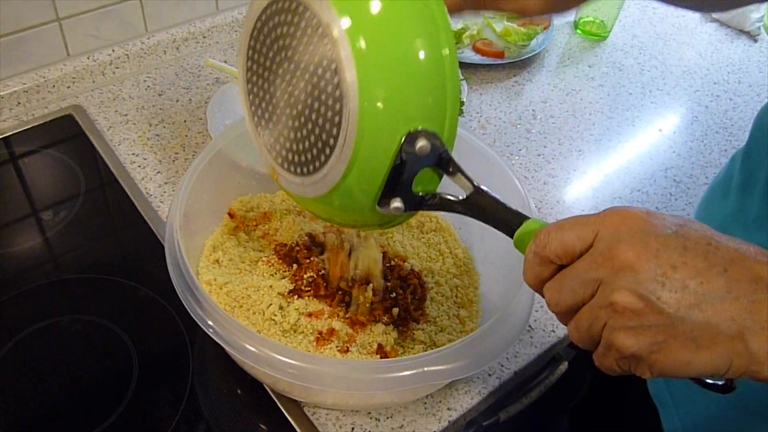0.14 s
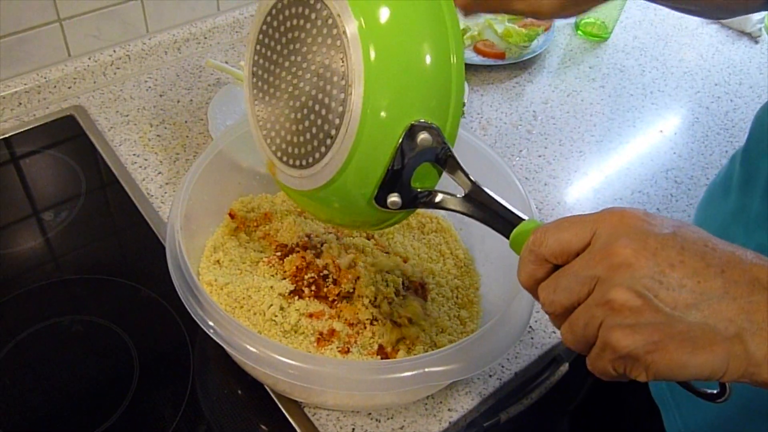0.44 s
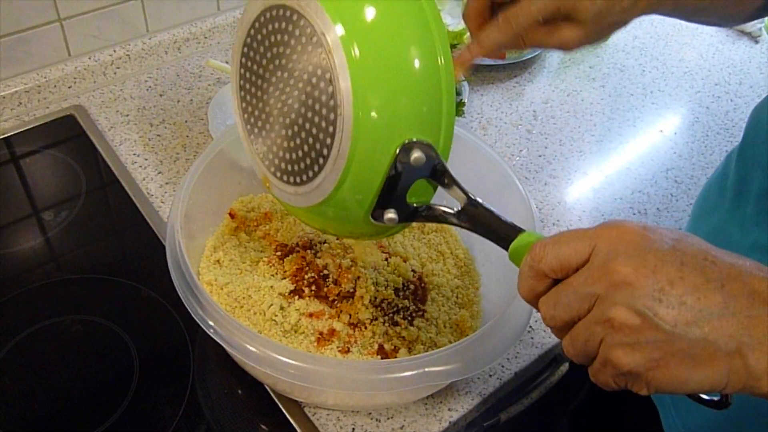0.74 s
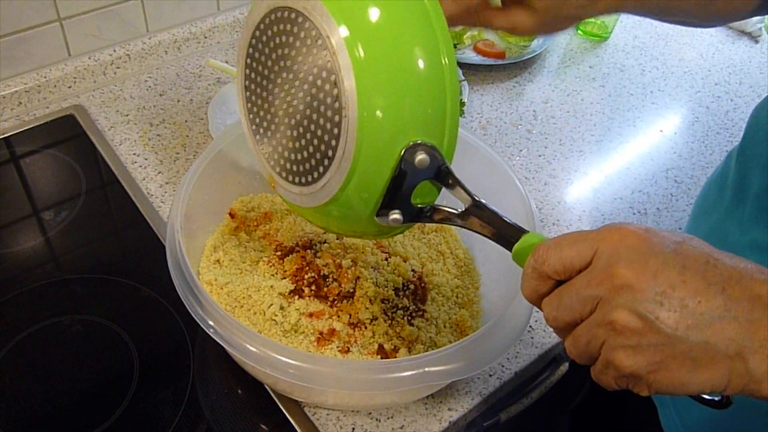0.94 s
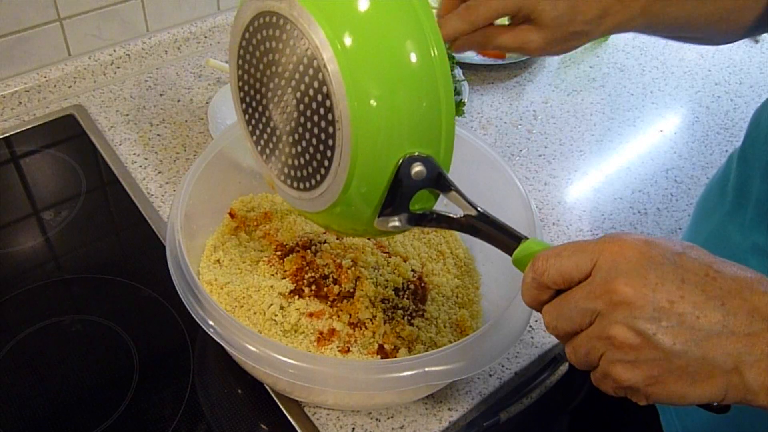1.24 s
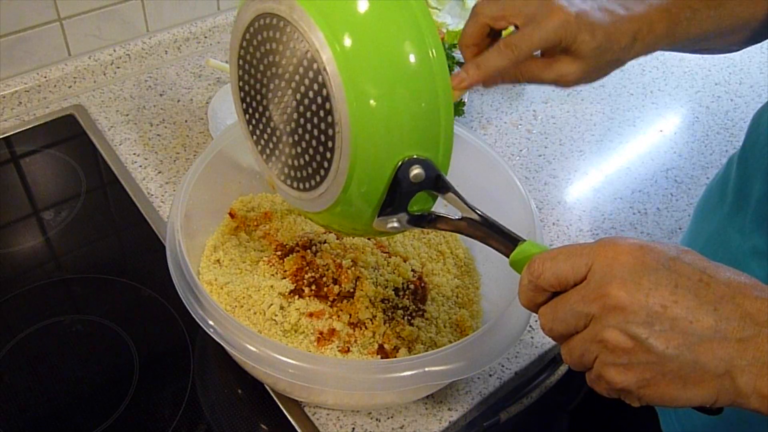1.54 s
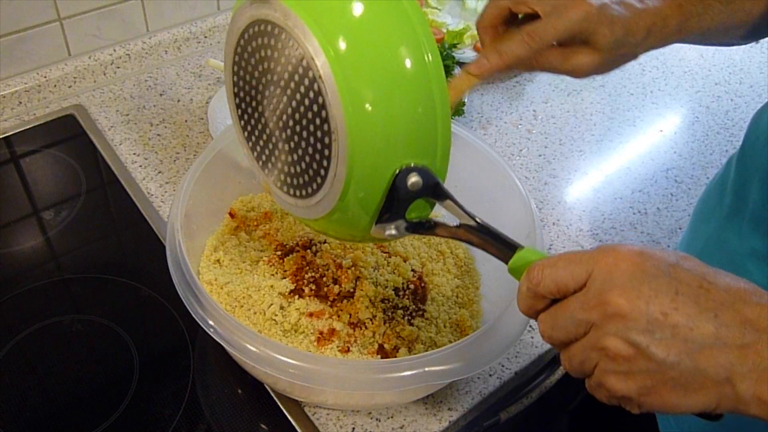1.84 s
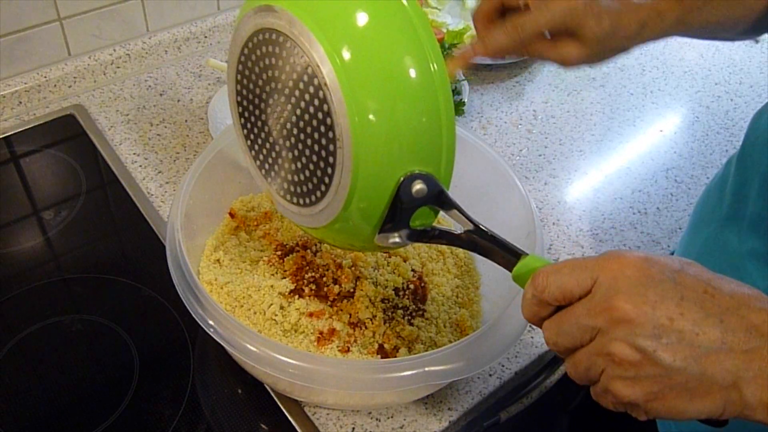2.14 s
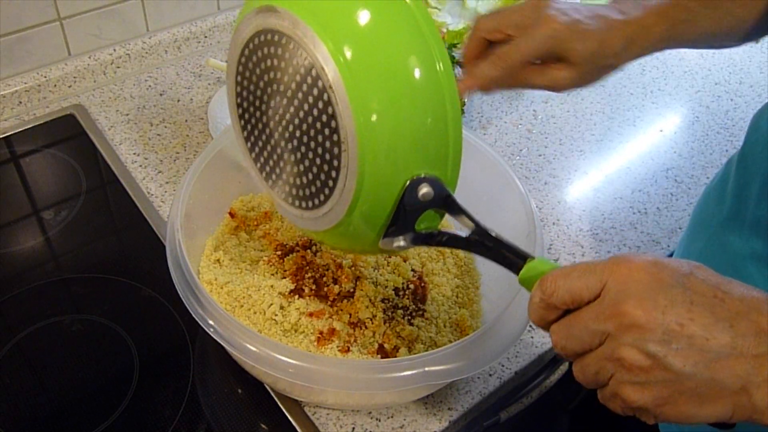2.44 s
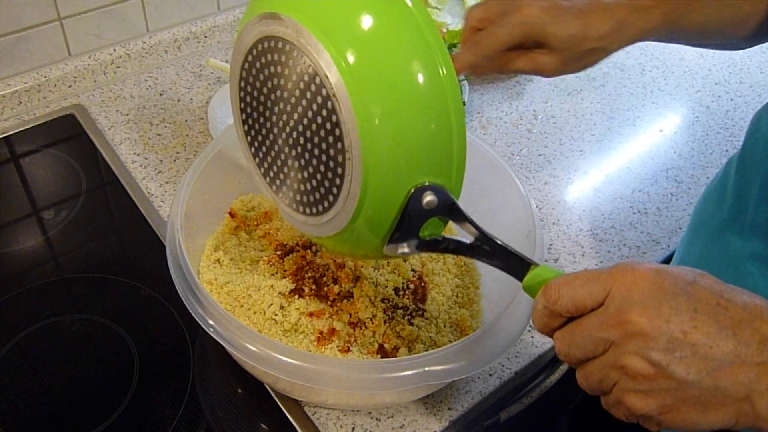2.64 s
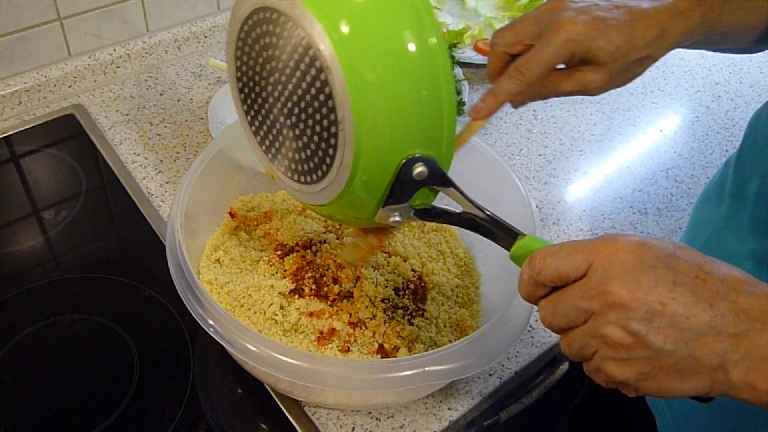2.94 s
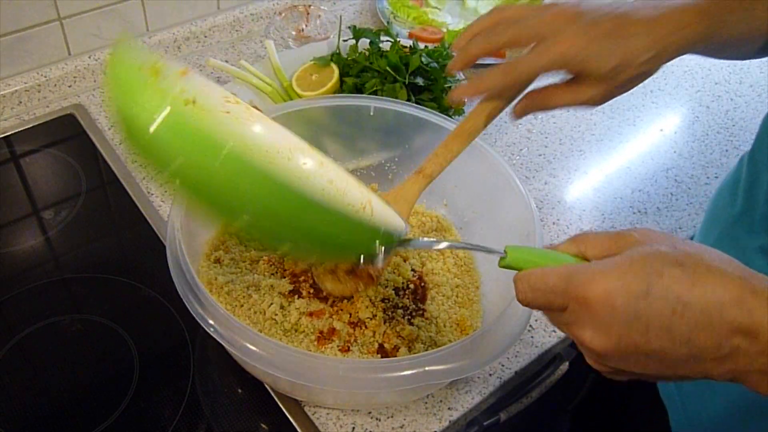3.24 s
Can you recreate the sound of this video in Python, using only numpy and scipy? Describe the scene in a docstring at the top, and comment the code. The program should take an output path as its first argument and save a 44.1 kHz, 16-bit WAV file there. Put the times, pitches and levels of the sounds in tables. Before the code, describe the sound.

A wooden spoon knocks and scrapes a nonstick pan after food plops into a plastic bowl

```python
"""Over a steady hiss with a faint whine (coloured noise, a sine), lumps of food plop into a plastic bowl
(noise bursts, low partials). A wooden spoon then knocks on a nonstick pan (dispersed clack, ringing
partials) and scrapes it out (random slips through the pan's response). At the end the pan bumps the
bowl (pulse, rattle, partials). A small kitchen answers briefly (decaying noise as impulse response)."""
import sys
import numpy as np
from scipy import signal
from scipy.fft import rfft, irfft
from scipy.io import wavfile

SR = 44100
rng = np.random.default_rng(int(sys.argv[2]) if len(sys.argv) > 2 else 0)


def wrap_up_sound(samples):
    """Save the sound to the file named by the first command line argument, as 16-bit audio."""
    columns = np.atleast_2d(samples).T
    # keep every value between -1 and 1, then stretch to whole-number steps
    tamed = np.clip(columns, -1, 1)
    steps = np.round(tamed * 32767).astype(np.int16)
    wavfile.write(sys.argv[1], SR, steps)


N = 149940

# partials of the pan wall: (frequency [Hz], level [dB], t60 [s])
PAN_WALL_MODES = [(276, -9, 0.038), (412, -5, 0.046), (482, -6, 0.16), (546, -12.5, 0.27), (800, -10, 0.16),
                  (915, -7, 0.12), (1035, -11.5, 0.04), (1065, -10.5, 0.19), (1210, -27.5, 0.032),
                  (1344, -10.5, 0.077), (1658, -2, 0.1), (1840, -7, 0.092), (3140, -13, .12),
                  (4160, -11, 0.094)]
# thin high partials of the pan rim: (frequency [Hz], level [dB], t60 [s])
PAN_RIM_MODES = [(2787, -6.5, 0.088), (3084, -2, 0.051), (5240, -4, 0.12), (5370, 9, 0.017),
                 (6460, -3.5, 0.035), (6750, -16, 0.041), (9480, -19, .04)]


def undb(db):
    """Decibels to gain."""
    return 10 ** (np.asarray(db) / 20)


def unit(x):
    """Scale to unit energy."""
    return x / np.sqrt(np.sum(x ** 2))


def add(out, start_s, x):
    """Mix a sound in at a time."""
    i = max(int(start_s * SR), 0)
    out[i:i + len(x)] += x[:max(N - i, 0)]


def fade(t60_s):
    """One second of exponential decay, -60 dB at t60."""
    return np.exp(-np.log(1000) * np.arange(SR) / SR / t60_s)


def lowpass(x, hz, order=2):
    """Gentle treble roll-off."""
    return signal.sosfilt(signal.butter(order, hz, fs=SR, output="sos"), x)


def through(x, response):
    """Pass a sound through an impulse response."""
    return signal.fftconvolve(x, response)[:len(x)]


def click(colour, size=4096):
    """Causal, minimum-phase, unit-energy pulse with the given (Hz, dB) colour."""
    hz, db = np.array(colour).T
    f = np.maximum(np.arange(size // 2 + 1) * SR / size, 1)
    gain = undb(np.interp(np.log(f), np.log(hz), db))
    # folding the cepstrum onto positive times gives minimum phase
    cepstrum = irfft(np.log(gain))
    cepstrum[1:size // 2] *= 2
    cepstrum[size // 2 + 1:] = 0
    pulse = irfft(np.exp(rfft(cepstrum)))
    return unit(np.pad(pulse, (0, SR - size)))


def burst(pulse, t60_s):
    """Dense, quickly dying vibration with the colour of a pulse."""
    return unit(through(rng.standard_normal(SR) * fade(t60_s), pulse))


def ring(modes):
    """Decaying partials, neighbours swinging in opposite directions."""
    t = np.arange(SR) / SR
    out = np.zeros(SR)
    for k, (hz, db, t60_s) in enumerate(modes):
        out += (-1) ** k * undb(db) * fade(t60_s) * np.sin(2 * np.pi * hz * t)
    return out


def background():
    """Room noise and hiss as coloured noise, with a faint electrical whine as a sine."""
    # noise spectrum: (frequency [Hz], relative density [dB per Hz])
    hiss_colour = [(18, -11), (30, -33), (33, -12), (225, -2), (302, -6), (377, -4), (470, -7), (1140, -13),
                   (1220, -15.5), (1350, -14.5), (1600, -15.5), (2000, -17.5), (6510, -23), (8740, -33),
                   (10600, -52.5), (13800, -78), (22000, -120)]
    hiss_db, whine_hz, whine_rms_db = -55, 7530, -86
    hiss = through(rng.standard_normal(N), click(hiss_colour))
    whine = np.sqrt(2) * np.sin(2 * np.pi * whine_hz * np.arange(N) / SR)
    return undb(hiss_db) * hiss + undb(whine_rms_db) * whine


def food_plops():
    """Moist lumps land with a tick and a dull thump of the filled bowl."""
    # landings: (time [s], level [dB], brightness [Hz], low thump [dB], wet tick [dB])
    plops = [(.043, -14.5, 2000, -15, -2), (.051, -8.5, 900, -12, -18), (0.076, -13, 696, 8, -20),
             (0.121, 0, 550, 0.5, -25), (0.154, 0, 1390, 2.5, -14), (0.165, -20, 600, -4, -30),
             (0.184, -13.5, 1700, -10, -9), (0.2525, -2, 2440, 6.5, 3.5), (0.384, -15, 1200, -21, -17)]
    # colour of the soft impact: (frequency [Hz], level [dB])
    food_colour = [(80, -6.5), (200, 0), (550, 2.5), (1000, -5), (1250, -13), (1650, -3), (2400, -17),
                   (8000, -36)]
    # colour of the wet tick: (frequency [Hz], level [dB])
    tick_colour = [(1500, -22), (2900, -5.5), (3400, 0), (4000, -1), (4700, -15), (7000, -18.5),
                   (10500, -45)]
    # partials of the filled bowl: (frequency [Hz], level [dB], t60 [s])
    thump_modes = [(143.7, -2, 0.12), (241, 2.5, 0.1), (276, 0.5, 0.055)]
    food_gain_db, tick_gain_db, thump_gain_db = -12, -23.5, -41
    food_t60_s, tick_t60_s = .04, 0.0055

    out = np.zeros(N)
    food, tick, thump = click(food_colour), click(tick_colour), ring(thump_modes)
    for time_s, db, bright_hz, thump_db, tick_db in plops:
        x = undb(food_gain_db) * lowpass(burst(food, food_t60_s), bright_hz)
        x = x + undb(thump_gain_db + thump_db) * thump
        x = x + undb(tick_gain_db + tick_db) * burst(tick, tick_t60_s)
        add(out, time_s, undb(db) * x)
    return out


def kitchen(x):
    """Diffuse reflections: coloured noise tail whose treble dies slightly sooner."""
    # colour of the reverberation: (frequency [Hz], level [dB])
    room_colour = [(100, -3.5), (300, -1), (550, -1.5), (900, 1), (1300, -5.5), (1700, -1), (3500, -8),
                   (9000, -4)]
    t60_s, treble_t60_s, split_hz, delay_s = 0.52, 0.45, 3300, .012
    noise = rng.standard_normal(SR)
    low = lowpass(noise, split_hz, order=1)
    tail = unit(low * fade(t60_s) + (noise - low) * fade(treble_t60_s))
    hz, db = np.array(room_colour).T
    bin_hz = np.arange(SR // 2 + 1) + 1  # 1 Hz bins, offset by one to avoid log(0)
    gain = undb(np.interp(np.log(bin_hz), np.log(hz), db))
    tail = irfft(rfft(tail) * gain)[:SR * 3 // 4]
    return through(x, np.pad(tail, (int(delay_s * SR), 0)))


def disperse(x, count=6):
    """Bending waves carry treble faster than bass: all-passes smear a click into a downward chirp."""
    corner_hz = 1522
    g = np.tan(np.pi * corner_hz / SR)
    a = (g - 1) / (g + 1)
    for _ in range(count):
        x = signal.lfilter([a, 1], [1, a], x)
    return x


def favour(x, hz):
    """The struck spot brings out one region of the spectrum."""
    added_band_db, q = 2.5, 4.5
    band = signal.lfilter(*signal.iirpeak(hz, q, fs=SR), x)
    return x + undb(added_band_db) * band


def spoon_knocks():
    """The wood clacks and the pan rings, differently at each spot; a cushion of food dulls the contact."""
    # knocks: (time [s], level [dB], contact brightness [Hz], low body [dB], pan ring [dB],
    #          high ping [dB], pitch favoured by the spot [Hz])
    knocks = [(.5058, -15, 3200, 8, -14, -4, 510), (0.5233, -6, 4600, -1, 3.5, 5, 1760),
              (.536, -10.5, 8000, 5, -9.5, -10, 520), (0.9065, -2, 4000, -3, -2, -6, 1140),
              (.917, -15.5, 1200, 11, -20, -10, 438.4), (1.2745, -10.5, 1500, 5, -3.5, -14, 1090),
              (1.283, -17, 1000, 9.5, -11, -15, 395), (1.721, -19.5, 5000, 5, -11, -4, 2780),
              (1.9215, 2, 4720, -2, -0.5, 10, 1390), (1.9276, -5, 4500, -1, -8, -6, 2630),
              (2.075, -24, 5500, 0, -9, 2, 550), (2.2989, -6, 2650, 3.5, 2, 1, 1070),
              (2.309, -13, 1700, -3, -16, -10, 560), (2.784, -12, 8000, -9, -11, 7, 920)]
    # colour of the wooden clack: (frequency [Hz], level [dB])
    wood_colour = [(100, -16.5), (250, -4.5), (450, 2.5), (750, 2), (1300, -1.5), (1800, -3), (2300, -10.5),
                   (4000, -12), (6500, -14.5), (10500, -34.5)]
    crack_db, wood_db, wood_t60_s = -8.5, -7, 0.081
    pan_db, rim_db, body_hz = -32, -51, 600

    out = np.zeros(N)
    wood = disperse(click(wood_colour))
    pan, rim = ring(PAN_WALL_MODES), ring(PAN_RIM_MODES)
    for time_s, db, bright_hz, body_db, ring_db, ping_db, spot_hz in knocks:
        x = undb(crack_db) * wood + undb(wood_db) * burst(wood, wood_t60_s)
        x = x + undb(pan_db + ring_db) * pan
        x = x + (undb(body_db) - 1) * lowpass(x, body_hz, order=1)  # low shelf
        x = lowpass(favour(x, spot_hz), bright_hz)
        add(out, time_s, undb(db) * (x + undb(rim_db + ping_db) * rim))
    return out


def spoon_scrapes():
    """Tiny irregular slips swell and fade with each stroke, and excite wall and rim."""
    # strokes: (three times [s], level [dB], brightness [Hz]); sorted, the times are start, peak, end
    scrapes = [(0.532, 0.536, 0.72, -5, 3500), (1.001, 1.079, 1.132, 0.5, 5500),
               (1.658, 1.77, 1.66, -6, 4000), (1.94, 1.963, 2.33, -10, 6000),
               (2.32, 2.488, 2.535, -1, 6000), (2.776, 2.782, 2.89, -1, 7000),
               (2.835, 2.934, 2.9, -7.5, 7000)]
    # friction of wood on the coating: (frequency [Hz], level [dB])
    rub_colour = [(200, 1), (800, 9.5), (1300, 6), (1680, -1), (2200, 2.5), (3150, -1.5), (4000, 6.5),
                  (5000, 1), (6500, 7), (7800, -9.5), (9600, -18), (10500, -32.5)]
    # partials that rubbing brings out: (frequency [Hz], level [dB], t60 [s])
    rub_modes = [(1647, -80.5, 0.073), (3167, -84, .05), (9500, -83.5, 0.009)]
    rub_db, wall_db, rim_db = -55, -88.5, -83
    slips_per_s, slip_spread_db = 1500, 3

    t = np.arange(N) / SR
    slips = (rng.random(N) < slips_per_s / SR) * rng.standard_normal(N)
    slips = slips * undb(slip_spread_db * rng.standard_normal(N))
    slips = slips / slips.std()
    force = np.zeros(N)
    for *times_s, db, bright_hz in scrapes:
        swell = np.interp(t, np.sort(times_s), [0, 1, 0])
        force += undb(db) * swell * lowpass(slips, bright_hz, order=1)

    body = undb(rub_db) * click(rub_colour) + ring(rub_modes)
    body += undb(wall_db) * ring(PAN_WALL_MODES) + undb(rim_db) * ring(PAN_RIM_MODES)
    return through(force, body)


def bowl_bump():
    """One hollow blow of the pan flexes the bowl; it rattles briefly and rings."""
    # colour of the blow: (frequency [Hz], level [dB])
    bump_colour = [(60, -31), (130, -0.5), (210, 3.5), (370, -3), (490, 9), (700, 0), (1250, -5),
                   (1550, -12.5), (2800, -24.5), (5500, -38), (7500, -61), (10000, -81)]
    # colour of the rattle: (frequency [Hz], level [dB])
    rattle_colour = [(60, -18), (130, -4), (230, -2.5), (380, 6), (490, 2.5), (700, -0.5), (1250, -1),
                     (1600, -10.5), (2400, -16.5), (3500, -25.5), (5500, -29), (10000, -59)]
    # partials of the bowl: (frequency [Hz], level [dB], t60 [s])
    bowl_modes = [(198, -1.5, 0.15), (315.7, -6.5, 0.58), (447, -5.5, .35), (490, 4.5, 0.31),
                  (566, -7, 0.25), (618, -6, 0.61), (725, -9, 0.1), (935, -3.5, 0.14), (1240, -8.5, 0.34),
                  (1556, -17, .22), (1707, -13.5, .22), (2240, -14, .2)]
    time_s, blow_db, rattle_db, rattle_t60_s, bowl_db = 3.2667, 7.5, 1.5, 0.13, -29
    flex_mode = (509, -10, 0.028)  # heavily damped wall flexing: Hz, dB, t60 s

    out = np.zeros(N)
    x = undb(blow_db) * click(bump_colour) + ring([flex_mode])
    x += undb(rattle_db) * burst(click(rattle_colour), rattle_t60_s)
    x += undb(bowl_db) * ring(bowl_modes)
    add(out, time_s, x)
    return out


def scene():
    """Pan and bowl close to the microphone, in the kitchen."""
    pan_wet_db, bowl_wet_db = -8.5, -9.5
    bowl = food_plops() + bowl_bump()
    pan = spoon_knocks() + spoon_scrapes()
    wet = kitchen(undb(pan_wet_db) * pan + undb(bowl_wet_db) * bowl)
    return (pan + bowl + wet + background())[None]


def record(dry):
    """The recorder rounds the loudest peaks, cuts the top and adds a small constant offset."""
    saturation, top_hz, offset = 0.52, 10800, .0207  # saturation and offset in full-scale amplitude
    rounded = dry / (1 + (dry / saturation) ** 4) ** (1 / 4)
    top_cut = signal.ellip(8, .2, 70, top_hz, fs=SR, output="sos")
    return signal.sosfilt(top_cut, rounded) + offset


dry = scene()
out = record(dry)
wrap_up_sound(out)
```